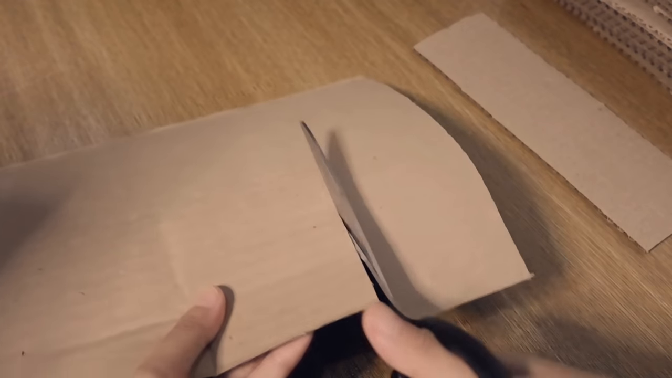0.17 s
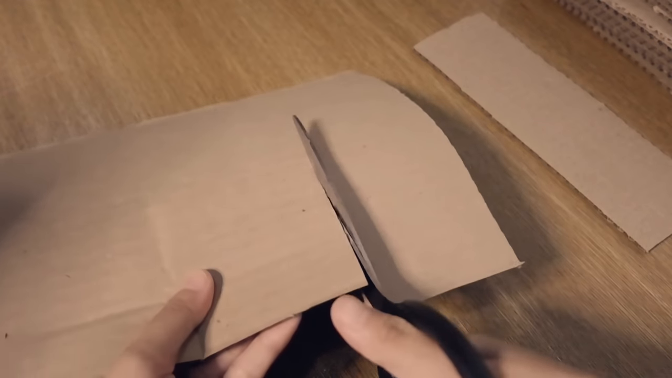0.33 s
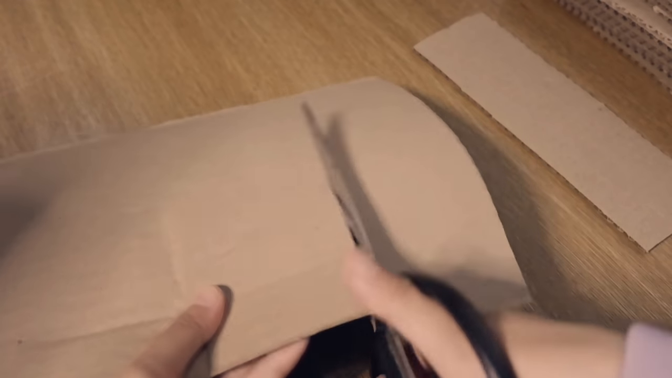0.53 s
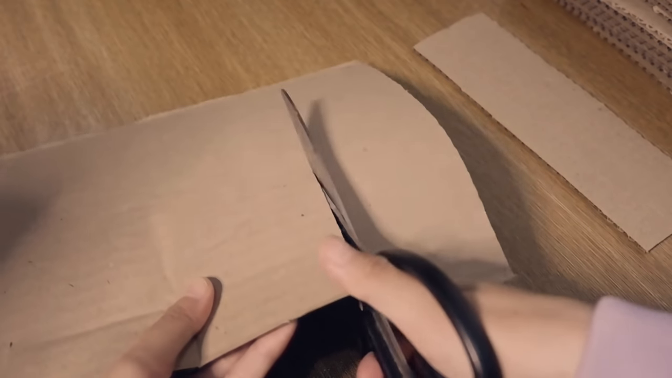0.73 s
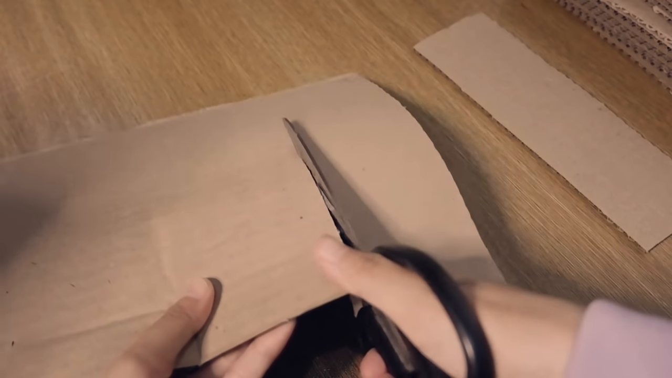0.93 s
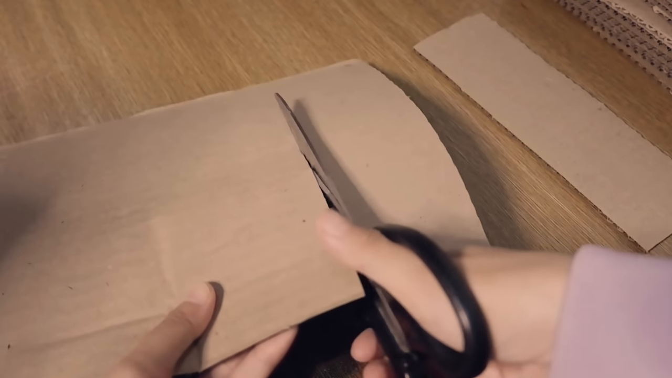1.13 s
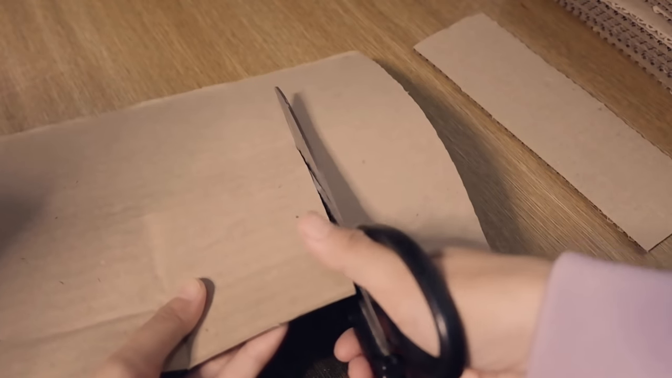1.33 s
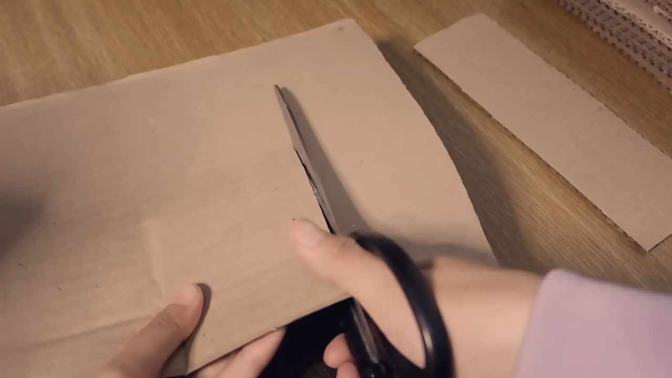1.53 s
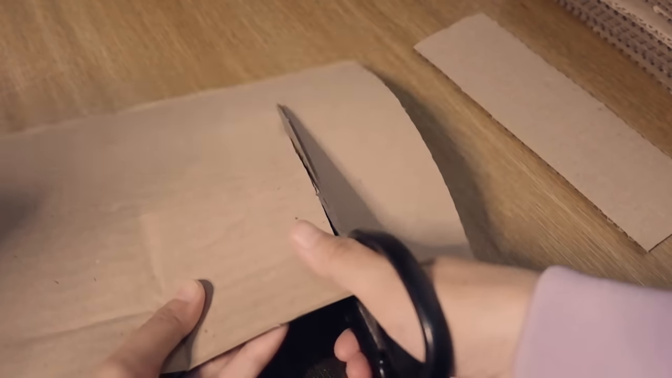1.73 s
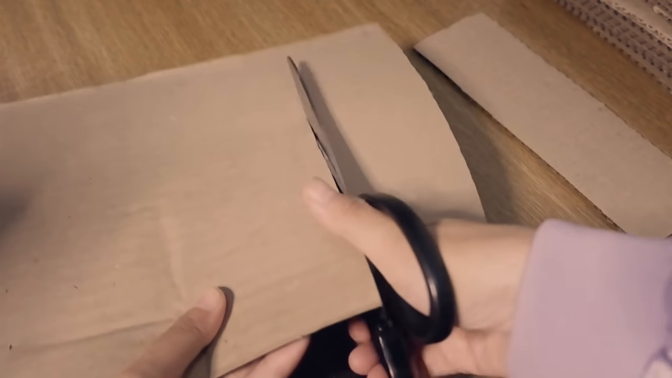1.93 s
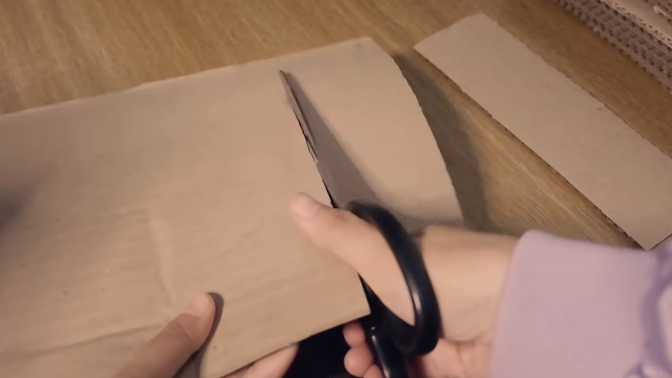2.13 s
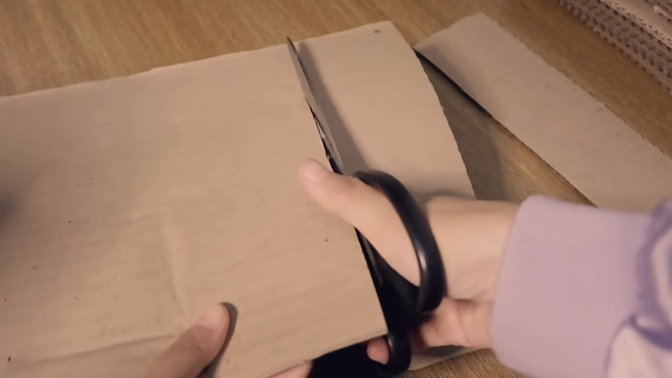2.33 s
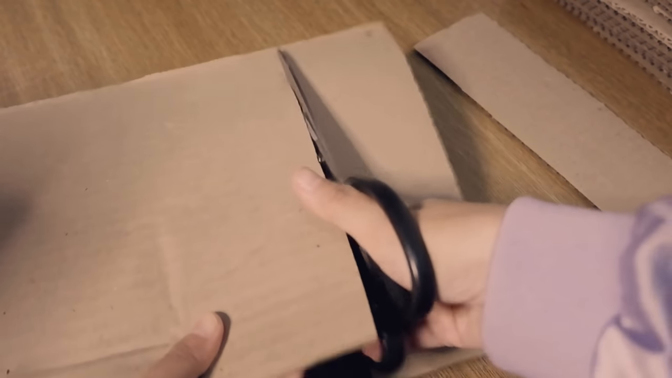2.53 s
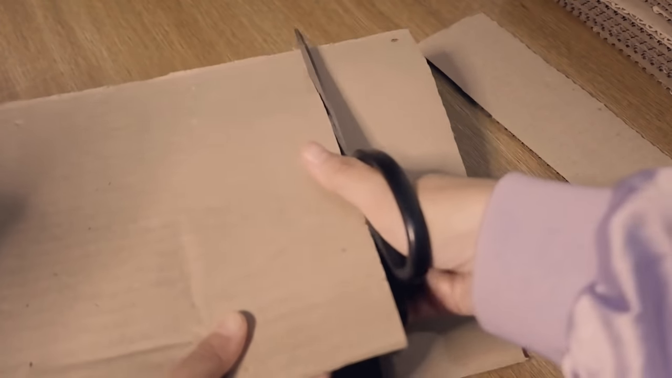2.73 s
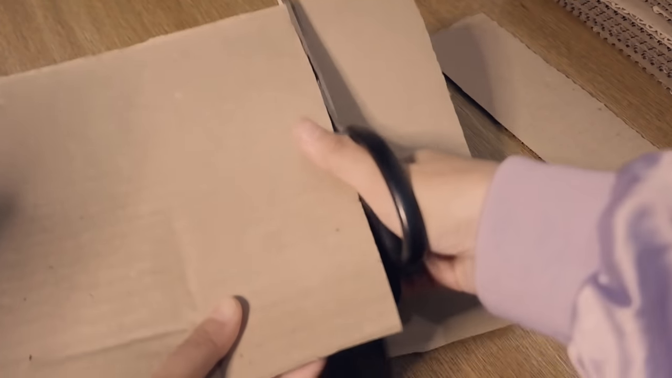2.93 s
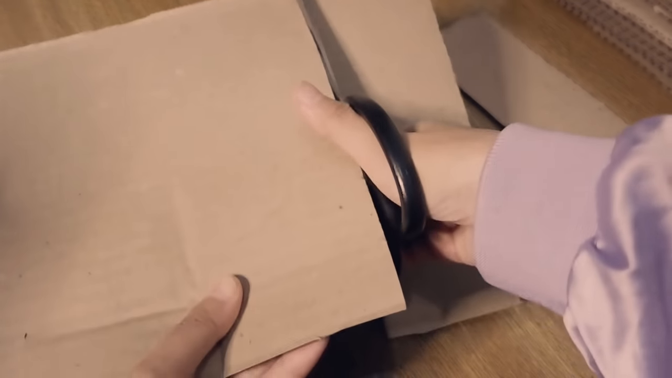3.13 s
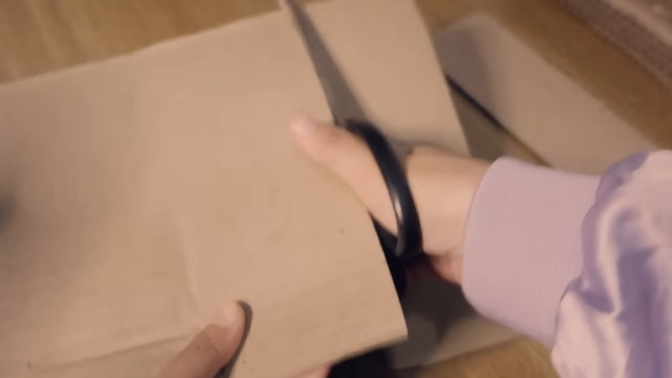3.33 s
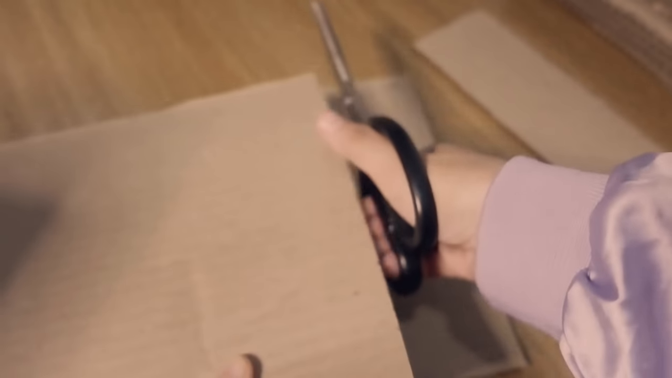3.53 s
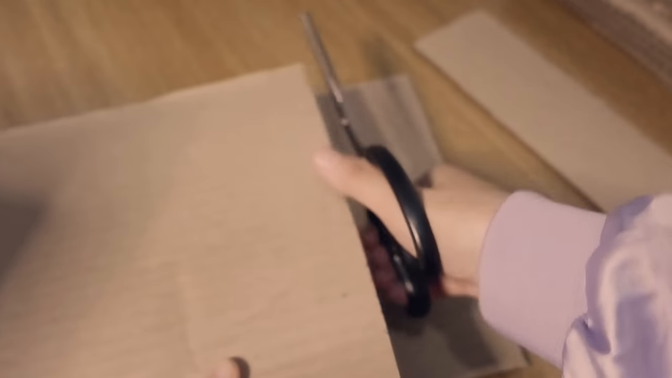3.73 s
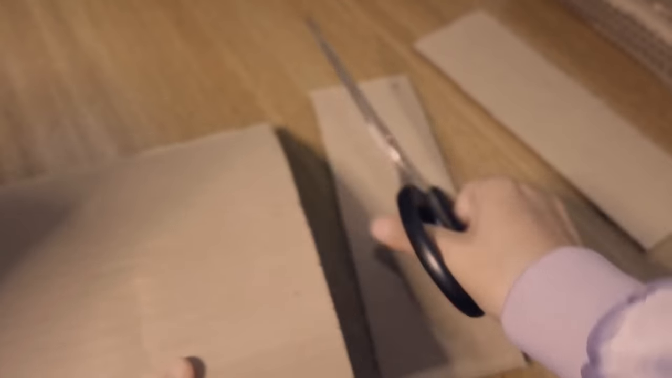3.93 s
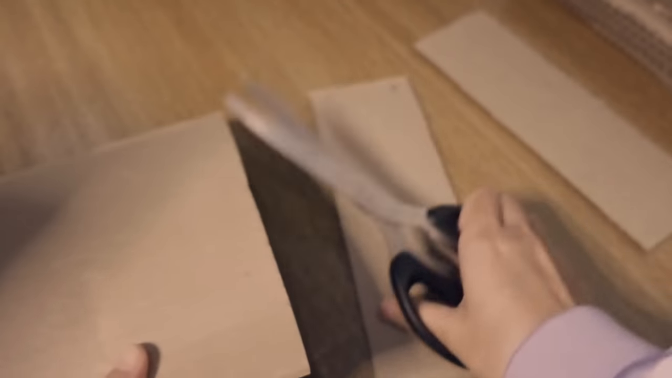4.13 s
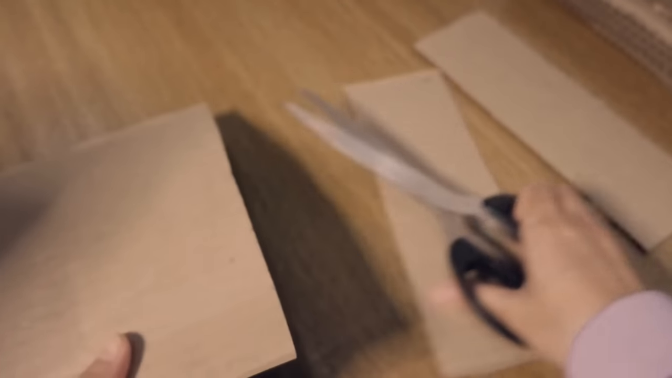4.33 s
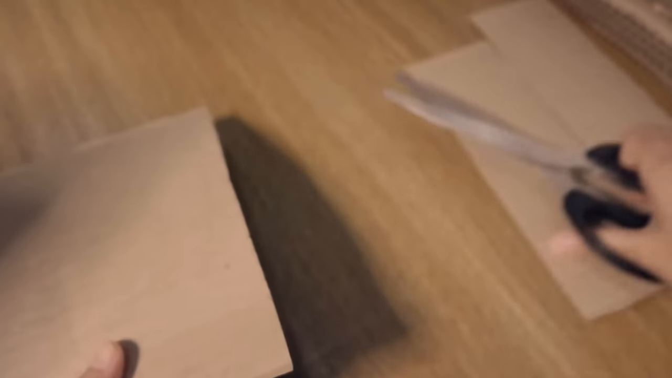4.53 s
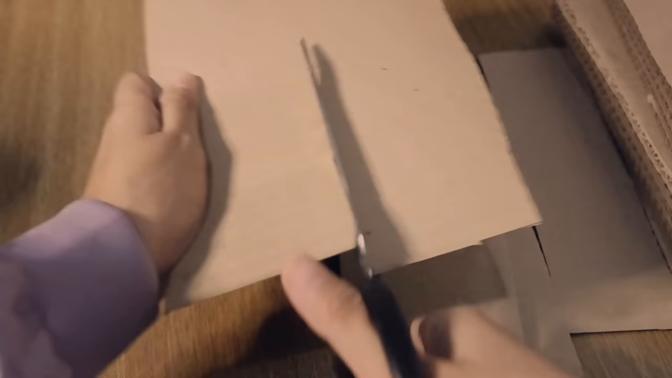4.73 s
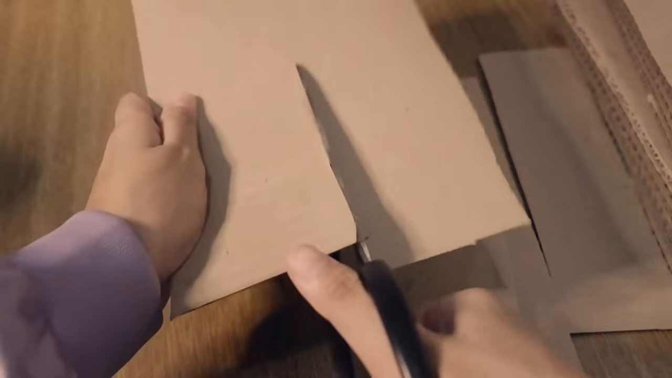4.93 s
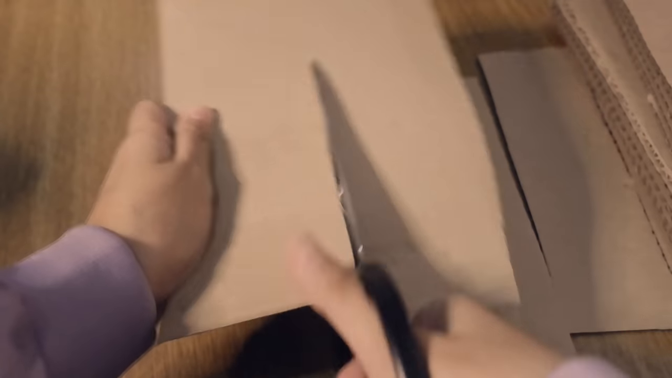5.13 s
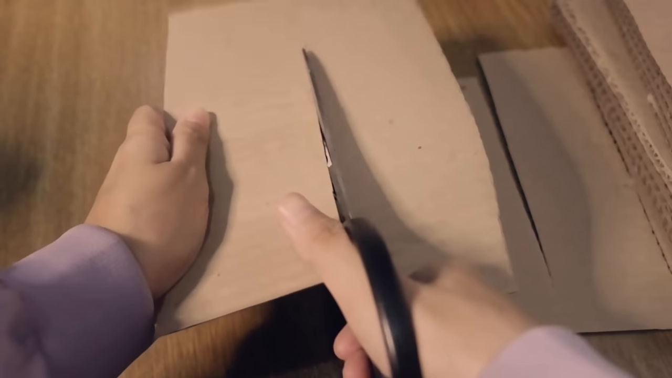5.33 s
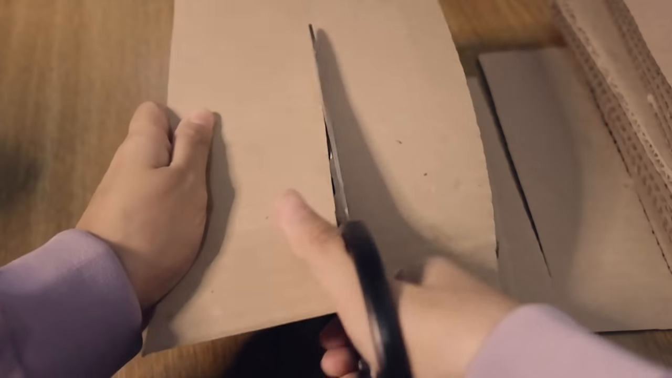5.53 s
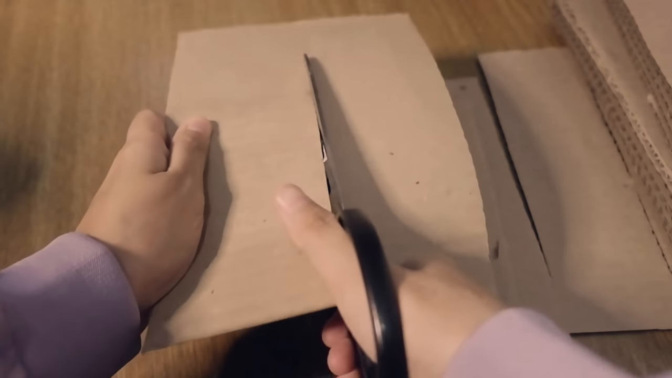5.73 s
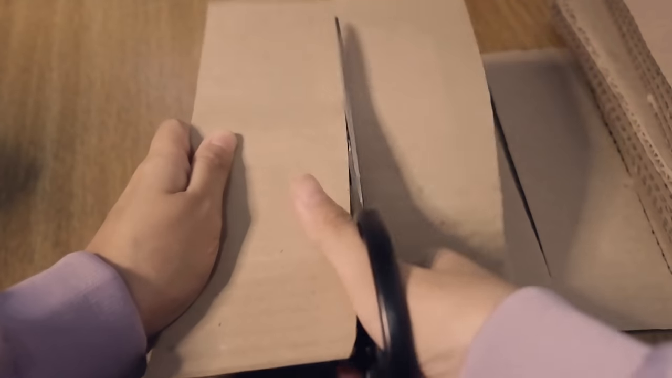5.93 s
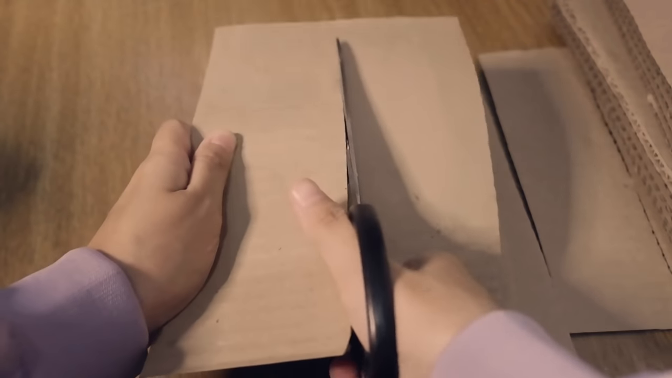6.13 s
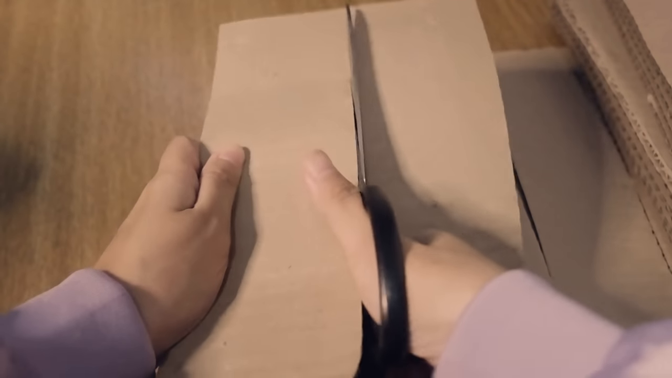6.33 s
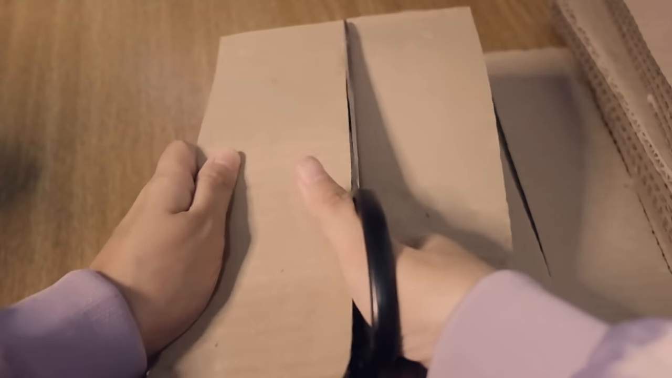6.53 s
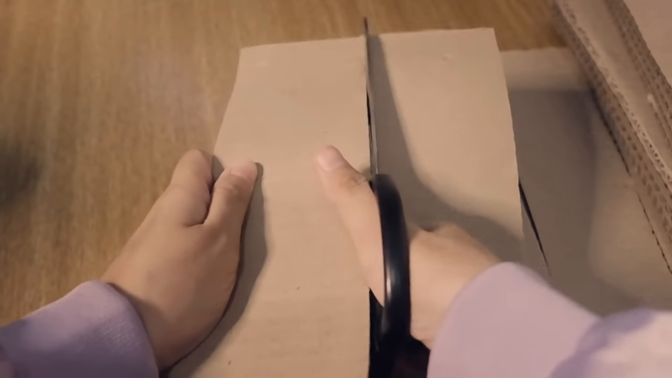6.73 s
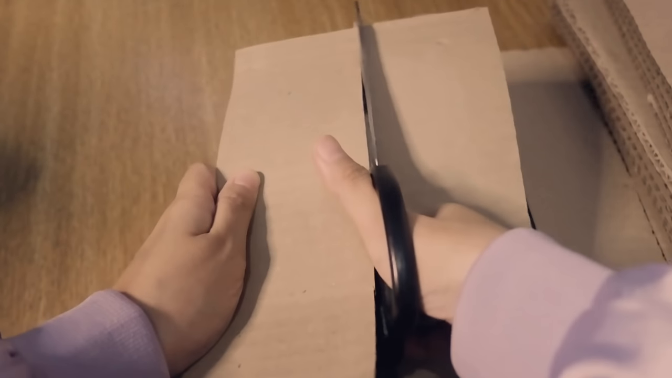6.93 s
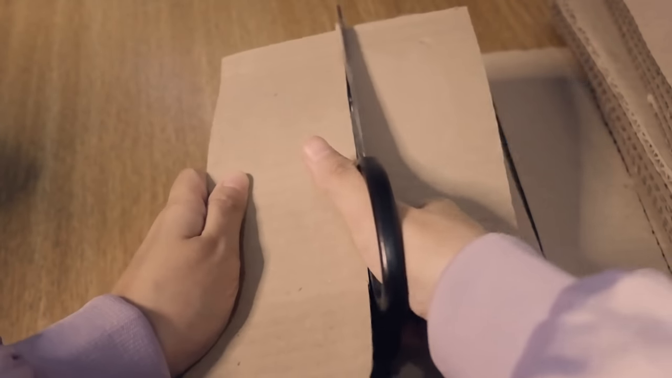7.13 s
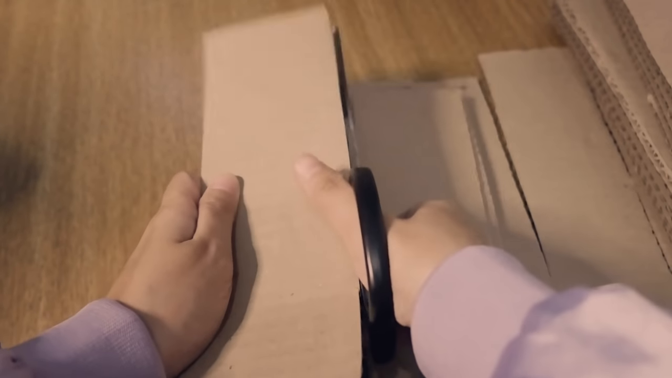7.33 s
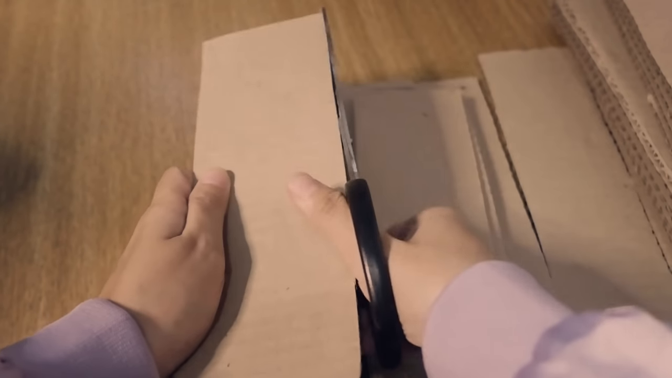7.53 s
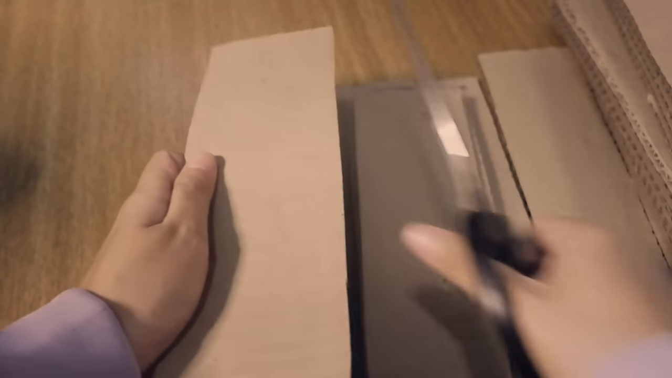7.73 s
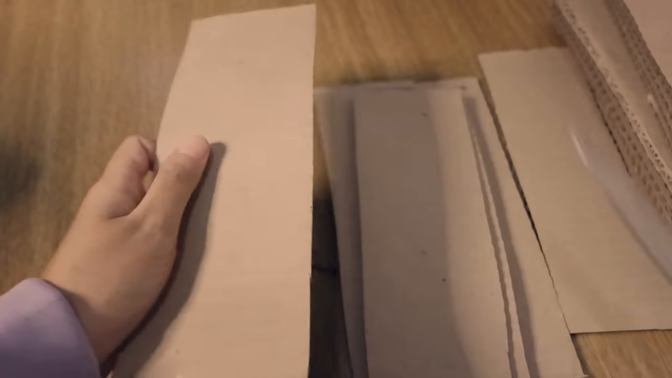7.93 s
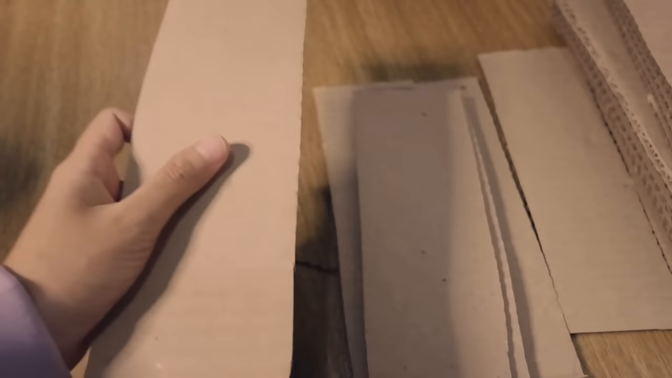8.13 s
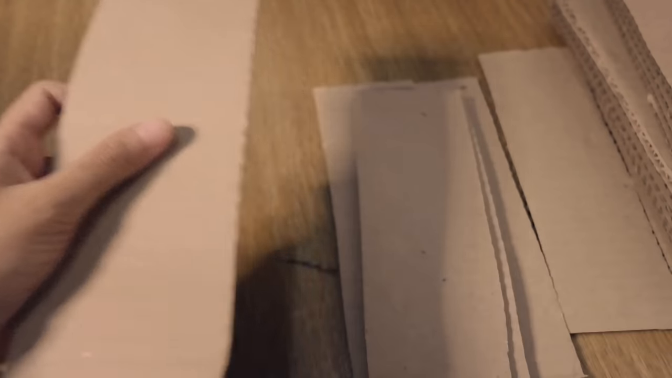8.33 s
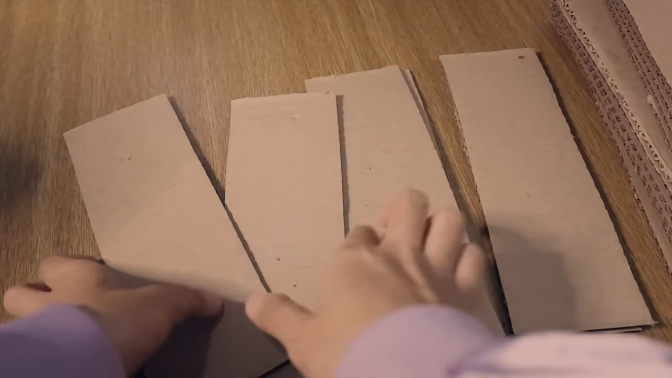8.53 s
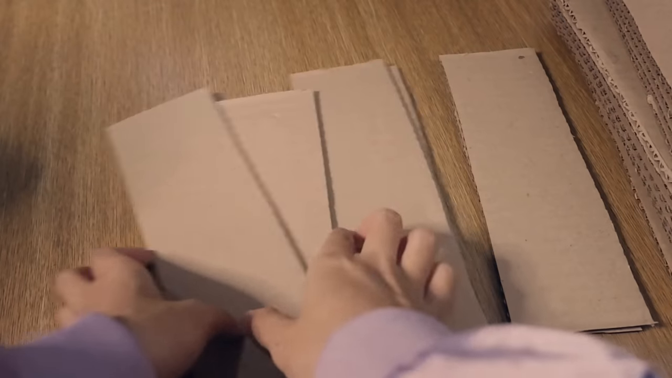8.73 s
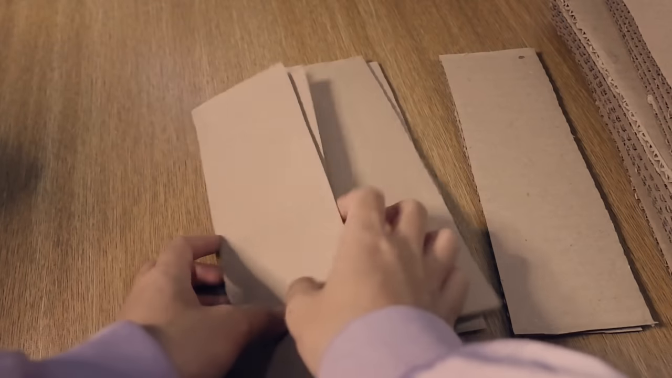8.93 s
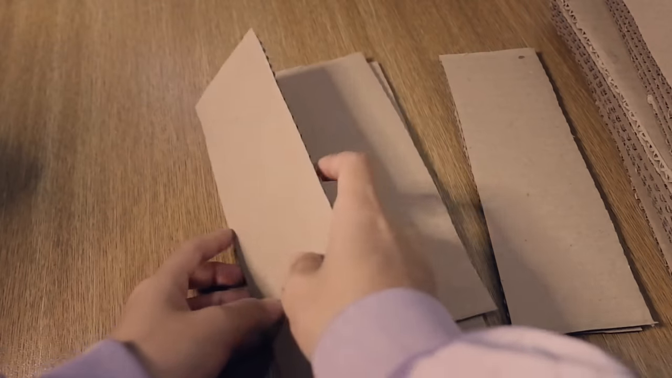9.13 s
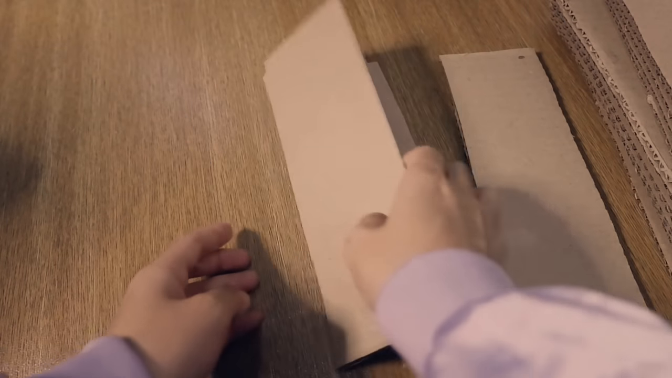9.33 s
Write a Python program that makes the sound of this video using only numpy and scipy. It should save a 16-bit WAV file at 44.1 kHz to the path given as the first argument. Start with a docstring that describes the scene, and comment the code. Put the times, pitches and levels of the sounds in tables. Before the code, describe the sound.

Two strips of stiff board are cut above a wooden desk. Hollow, woody crackles with bright snaps alternate with thin steel scrapes; the blades slam shut at the end of each cut and chatter briefly. Between cuts there is only faint rustle and swish. Afterwards the strips drop softly, slide over one another and are picked up with small taps. Close and detailed, short room echo, faint steady hiss.

```python
"""Cardboard rustles and steel blades hiss open; then each squeeze of large scissors cracks the board.
Two strips are cut off above a wooden desk in a small room, and the blades clack shut as each comes free.
The strips are dropped, slid together and picked up. Cracks and knocks are bursts of random clicks,
hisses and rubs are longer streams of them; filters give each its colour, and resonances make things ring."""
import sys
import numpy as np
from scipy import signal
from scipy.fft import rfft, irfft
from scipy.io import wavfile

SR = 44100
rng = np.random.default_rng(int(sys.argv[2]) if len(sys.argv) > 2 else 0)


def inscribe(sig):
    """Save sig as 16-bit PCM at rate SR to the path in sys.argv[1].

    A 1-D sig is mono; a 2-D sig holds one channel per row.
    Samples are clipped to [-1, 1] before scaling.
    """
    pcm = np.round(np.clip(np.atleast_2d(sig).T, -1, 1) * 32767)
    wavfile.write(sys.argv[1], SR, pcm.astype(np.int16))


N = 418068

# Events. Levels of bursts and moves are those before the room and any resonances.
# the board gives way: start_s, length_s (nominal), level_db, crispness_db
CRACKS = [ (.338, 0.0017, -45.5, 3), (.364, 0.013, -28, -7.5), (.389, .007, -16.5, -10),
          (0.4175, 0.0015, -19.5, -15), (0.448, 0.0035, -24.5, -13.5), (0.485, 0.0044, -37.5, -8),
          (.570, 0.0034, -27.5, -15), (0.593, 0.0028, -27.5, -20), (0.603, 0.0039, -28.5, -5.5),
          (0.817, 0.00082, -23.5, -21), (0.8632, 0.0067, -19.5, -12.5), (0.8832, 0.0071, -18, -11),
          (0.908, 0.00096, -25, -15), (0.936, 0.0045, -24.5, -8), (1.132, 0.0046, -36.5, -14),
          (1.315, 0.0051, -41.5, -25), (1.451, 0.0011, -45, -20), (1.693, .0035, -37, -6.5),
          (1.7194, 0.0027, -18.5, -5), (1.7352, 0.0013, -19.5, -7.5), (1.7684, 0.00071, -22.5, -7),
          (2.0757, 0.0024, -29, 3.5), (2.097, 0.0056, -21.5, -3.5), (2.122, 0.0078, -26.5, -10),
          (2.1378, 0.0024, -24.5, -3), (2.3537, 0.00077, -31.5, -10.5), (2.4195, 0.006, -31.5, -2.5),
          (2.4399, 0.0094, -20.5, -6), (2.4649, 0.0085, -14, -9), (2.488, 0.009, -28.5, -3.5),
          (2.5464, .0055, -24, -3.5), (2.5902, 0.0088, -32.5, -4), (2.7176, .0075, -34, -11),
          (2.7765, 0.0044, -18.5, -5), (2.82, 0.0096, -19.5, -7), (3.373, 0.0018, -29.5, 0.5),
          (3.394, 0.0039, -18, -4), (3.4995, 0.0028, -31.5, 10.5), (4.7807, .006, -29.5, -11),
          (4.938, 0.0027, -32, -3), (4.9669, 0.0018, -16.5, -11.5), (4.9877, 0.005, -17, -18),
          (5.014, .005, -20, -7), (5.199, 0.0054, -29, -16), (5.356, .003, -22.5, -9),
          (5.376, 0.0039, -16.5, -10.5), (5.4045, 0.0038, -18.5, -11), (5.492, 0.0047, -37, -6),
          (5.702, 0.0016, -38, -14), (5.731, 0.0023, -22, -9.5), (5.7625, 0.0048, -14.5, -17.5),
          (5.782, 0.0076, -31.5, -5), (5.8847, .001, -38, -6), (6.098, .005, -29.5, -5),
          (6.1161, 0.0057, -15, -14.5), (6.132, 0.0027, -26.5, -2), (6.1575, .007, -22, -13),
          (6.4103, .004, -34.5, -11), (6.433, 0.0027, -30.5, -10), (6.4458, 0.0037, -22.5, -3),
          (6.4864, .001, -17.5, -11), (6.626, .015, -30, -10), (6.6513, 0.0045, -31.5, -6),
          (6.7491, 0.0024, -23.5, -1), (6.772, 0.0032, -29.5, -13), (6.793, 0.0028, -25, -12.5),
          (6.859, 0.0046, -44, -6), (6.905, 0.0033, -42, -16), (7.1795, 0.0054, -34.5, -10.5),
          (7.246, 0.003, -29, -7), (7.275, 0.003, -29, -10), (7.29, 0.0056, -19.5, -14),
          (7.3342, 0.0027, -20, -4.5)]
# the blades slam shut: start_s, level_db
CLACKS = [(3.4004, -13.5), (7.337, -14.5)]
# strips and fingers knock on the desk: start_s, length_s (nominal), level_db, thump_db (against level_db)
TAPS = [(7.3896, .012, -26, -30), (7.427, 0.0017, -35.5, -0.5), (8.169, 0.0014, -43.5, -6),
        (8.21, 0.0033, -44.5, -18), (8.234, .002, -42, -8), (8.2732, .0036, -38.5, -13),
        (8.284, 0.0028, -43.5, 2), (8.3393, 0.003, -40, -8), (8.947, .0035, -47, -24),
        (8.994, 0.00076, -37.5, -30), (9.034, 0.013, -37.5, -31), (9.08, 0.0067, -42.5, -25),
        (9.15, 0.0044, -50.5, -18), (9.2276, 0.0091, -43.5, -20), (9.387, .0045, -38.5, -12),
        (9.3926, 0.0015, -30.5, -6.5), (9.4046, 0.013, -42, -13)]
# the blades open and push on, levels before the stroke shapes them:
# start_s, end_s, steel_hiss_db, squeal_db, rubbed_sheet_db
OPENINGS = [(0.106, 0.213, -39.5, -77, -45), (.543, 0.627, -35.5, -51, -30.5),
            (1.059, 1.125, -38, -49, -34.5), (1.865, 1.936, -34, -40, -28),
            (2.227, 2.301, -36.5, -43.5, -31), (2.606, 2.683, -36, -48.5, -31.5),
            (2.98, 3.031, -46, -65, -57), (3.088, 3.154, -51, -74, -49), (4.736, 4.815, -31.5, -43.5, -28),
            (5.148, 5.239, -30, -47, -27), (5.534, 5.603, -34.5, -50, -34), (5.902, 6.006, -32, -48, -33.5),
            (6.275, 6.337, -32.5, -42.5, -29.5), (6.609, 6.674, -31.5, -48, -34.5),
            (6.938, 6.99, -42, -56, -41)]
# The next five tables are moves: start_s, fastest_s, end_s, level_db (at the fastest moment).
# A row that ends before it starts is silent.
# strips slide over each other on the desk: start_s, fastest_s, end_s, level_db
SLIDES = [(8.655, 8.715, 8.8, -36.5), (8.74, 8.83, 9.01, -33.5), (8.96, 9.04, 9.4, -46.5),
          (9.38, 9.47, 9.9, -47)]
# the sheet is let go and scuffs down: start_s, fastest_s, end_s, level_db
SCUFF = [(8.26, 8.278, 8.425, -33)]
# a sleeve or the loose strip swishes by; the first row is a short hiss that trails the strip tearing free at
# 3.5 s: start_s, fastest_s, end_s, level_db
SWISHES = [(3.487, 3.502, 3.56, -26), (4.15, 4.174, 4.06, -44.5), (4.2, 4.46, 4.796, -41.5),
           (7.66, 7.73, 7.6, -45.5)]
# the held sheet flexes between cuts and rustles: start_s, fastest_s, end_s, level_db
FLEXES = [(-.05, .01, 0.22, -44), (.1, .18, 0.33, -38.5), (1.13, 1.2, 1.37, -48),
          (1.64, 1.675, 1.74, -44.5), (2.88, 2.95, 3.22, -48.5), (3.4, 3.45, 3.36, -32),
          (4.68, 4.71, 4.76, -48), (6.88, 7.01, 7.2, -48), (7.42, 7.55, 8, -52)]
# the sheet sways and rumbles: start_s, fastest_s, end_s, level_db
SWAYS = [(1.56, 1.66, 2, -53), (3.0, 3.3, 3.9, -67), (6.95, 7.02, 7.13, -52)]
# fingers and edges drag on the sheet and make it groan: start_s, end_s, first_hz, last_hz, level_db
DRAGS = [(0.176, 0.248, 1350, 1046, -45), (0.256, 0.326, 604, 500, -46), (3.05, 3.354, 177.3, 174.4, -54.5),
         (3.838, 3.892, 790, 784, -48), (3.964, 3.977, 800, 780, -50), (7.718, 7.757, 960, 1080, -46.5),
         (7.709, 7.753, 2990, 3100, -55)]

# Colours. Each is a relative spectrum: pitch_hz, level_db (per Hz).
# heave of the whole sheet: pitch_hz, level_db
THUMP_COLOUR = [(60, -37.5), (130, -16.5), (220, -1.5), (330, 0), (520, 5), (700, 9), (1200, -44)]
# flap beside the blades: pitch_hz, level_db
RING_COLOUR = [(300, -40.5), (500, -9.5), (650, -3.5), (1000, -2.5), (1450, -1), (1800, -3), (2400, -37),
               (4000, -33)]
# lower part of breaking fibres: pitch_hz, level_db
CRUNCH_COLOUR = [(1200, -44.5), (1900, 11), (2700, 10), (3250, 11), (3750, 1.5), (4800, -38.5)]
# bright part of breaking fibres: pitch_hz, level_db
SNAP_COLOUR = [(3000, -12), (3900, 0), (4500, 8), (5300, 8), (7000, -2.5), (9300, -5), (11000, -13),
               (12500, -37), (16000, -56)]
# blow of the handles: pitch_hz, level_db
CLACK_COLOUR = [(80, -20), (200, -8), (450, -4), (900, -4), (1400, 1), (2000, -1), (2800, 0), (3800, -3),
                (4500, 1), (5800, -1), (6700, 1), (8500, -9), (12000, -25), (16000, -29)]
# blades chattering on each other: pitch_hz, level_db
BUZZ_COLOUR = [(300, -14), (500, -5), (900, -7), (1400, -2), (2500, -4), (3700, -4), (4500, -1), (6600, 1),
               (8500, -5), (10500, -12), (12500, -27), (16000, -38)]
# cardboard on wood: pitch_hz, level_db
KNOCK_COLOUR = [(300, -37), (600, -8), (900, -5), (1200, 3.5), (1550, 5.5), (1900, -15), (2500, -4),
                (4000, -35)]
# steel on steel: pitch_hz, level_db
STEEL_COLOUR = [(1200, -16), (1900, 5), (3000, 9.5), (3800, 0.5), (4500, 5.5), (5500, 3.5), (7500, 0.5),
                (9200, -5.5), (10500, -7), (12000, -21), (16000, -28)]
# cut edges rubbed by the blades: pitch_hz, level_db
RUB_COLOUR = [(80, -14), (200, -4.5), (320, 5.5), (450, 8.5), (750, 8), (1100, 3), (1500, 5), (2200, -15),
              (4000, -35)]
# strip on strip: pitch_hz, level_db
SLIDE_COLOUR = [(300, -30.5), (850, -14.5), (1100, 1.5), (1400, 9), (2000, -1), (2900, 2), (3900, -3),
                (5000, -2.5), (7000, -11), (10000, -16.5), (13000, -36)]
# sheet scuffing down: pitch_hz, level_db
SCUFF_COLOUR = [(80, -20), (200, 6), (280, -10), (450, 0), (800, -25), (1300, -22), (2100, -15),
                (3000, -1.5), (3800, -13), (5250, -5.5), (7000, -11), (10000, -17), (14000, -35)]
# passing sleeve or strip: pitch_hz, level_db
SWISH_COLOUR = [(500, -23.5), (1100, -5), (1500, 0), (2200, -3), (3100, 4), (3900, -1.5), (5000, -2),
                (7000, -13), (10000, -22), (13000, -42)]
# flexing sheet: pitch_hz, level_db
RUSTLE_COLOUR = [(150, -18), (300, -8.5), (550, -0.5), (800, 1.5), (1300, -1.5), (2000, -7), (5000, -26)]
# swaying sheet: pitch_hz, level_db
RUMBLE_COLOUR = [(30, -20), (75, -2), (110, -16), (180, 0), (260, -10), (500, -41)]
# steady background: pitch_hz, level_db
AIR_COLOUR = [(15, -46.5), (25, -25), (80, -10), (108, -12), (185, -4), (309, -10.5), (384, -10), (451, -9),
              (677, -12.5), (754, -11.5), (936, -13.5), (1560, -20), (3430, -21), (4490, -17),
              (16000, -30.5)]

# Space and bodies.
# colour of the room's difference between left and right: pitch_hz, gain_db
ROOM_WIDTH = [(60, -6), (200, -24), (1000, -27), (2500, -18), (5000, -12), (9000, -6), (15000, -8)]
# left-right difference of the background, against its common part: pitch_hz, gain_db
AIR_WIDTH = [(60, -4), (110, -6.5), (200, -5.5), (380, -4), (700, -5.5), (1290, -2), (2380, 0),
             (4400, -1.5), (8120, -2), (15000, 2)]
# time in which the room's echoes fall by 60 dB: pitch_hz, decay_s
ROOM_DECAY = [(150, 1), (500, 0.38), (1500, 0.46), (5000, 0.39), (12000, 0.23)]
# gain of the room's echoes before they are split into bands: pitch_hz, gain_db
ROOM_ECHO = [(100, 4), (220, -10.5), (400, -11), (1000, -12), (2500, -8), (5000, -11.5), (10000, -7)]
# resonances of the sheet as held for the first cut: pitch_hz, width_hz, level_db (over the plain sound)
FIRST_SHEET = [(270, 64, -12.5), (376, 51, -4.5), (464, 16, -13), (598, 50, -20), (737, 38, -1),
               (1138, 8, -5), (1428, 22, 0), (1590, 16, -2.5)]
# the same for the second cut: pitch_hz, width_hz, level_db (over the plain sound)
SECOND_SHEET = [(192, 14, 3), (345, 21, -5), (474.4, 9.1, -1), (646, 30, -20), (848, 100, -4.5),
                (963, 79, -3), (1070, 89, -1), (1293, 27, -4.5)]
# resonances of the blades: pitch_hz, width_hz, level_db (over the plain sound)
BLADES = [(2680, 55, -7), (3000, 27, -38), (4180, 79, -5), (4800, 25, -45), (5320, 160, -15),
          (5880, 82, -17), (8740, 200, -11)]
# the sheet's sound shifts as the blades cross it and the grip shifts, one curve a strip:
# time_s, flap_ring_hz, bending_mode_hz, thump_db, snap_db (both against the crack's level)
SHEET_CURVES = [
    [(.4, 800, 290, -5.5, -6.5), (.87, 765, 223, -7.5, -1), (1.73, 1000, 415, -6.5, -2),
     (2.1, 1140, 397, -6, -3), (2.46, 1190, 484, -8, -5), (2.8, 1070, 610, -10, -8),
     (3.39, 840, 338, -6, -11)],
    [(4.98, 800, 568, -5.5, -3.5), (5.38, 910, 530, -7, -3.5), (5.75, 940, 333, -10, -4),
     (6.12, 1010, 297, -6, -6), (6.45, 880, 278, -4.5, -6), (6.77, 870, 412, -7, -3),
     (7.28, 1040, 324, -8.5, -2)],
]

BURST = 4096  # samples in one burst
TIME = np.arange(N) / SR
AGE = TIME[:BURST]  # seconds since a burst began
LEAD_S = .008  # fibres strain this long before a fracture
REGRIP_S = 4.4  # the second strip's grip begins
AIR_DB = -51  # level of the part shared by left and right
CUTOFF_HZ = 16200
FLAP_WIDTH_HZ, RING_DB, CRUNCH_DB = 470, -3.5, -1  # levels against the crack's
BEND_WIDTH_HZ, BEND_DB = 57, 4.5  # the bending mode over the plain thump
SNAP_FOLLOWS = 0.93  # the snap takes this share of a crack's crispness
SLAM_THUMP_DB, CHATTER_DB = -12, -12  # against the blow of the handles
TAP_KNOCK_DB, TAP_CRUNCH_DB, TAP_SNAP_DB = -2, -1.5, -6  # against the tap's level
HARDEST_RUB = .7  # share of the stroke at which the cut edges press hardest


def from_db(db):
    """Turn decibels into gain."""
    return 10 ** (np.asarray(db) / 20)


def rms_one(x):
    """Scale to an rms of 1."""
    return x / np.sqrt(np.mean(x ** 2) + 1e-20)


def at_hz(points, hz):
    """Read a table on a log-frequency axis."""
    table = np.array(points)
    return np.interp(np.log(np.maximum(hz, 1)), np.log(table[:, 0]), table[:, 1])


def colour(x, spectrum):
    """Filter with the given spectrum, without sounding ahead of time (minimum phase)."""
    hz = np.arange(BURST // 2 + 1) * SR / BURST
    cepstrum = irfft(np.log(from_db(at_hz(spectrum, hz))))
    # folding the second half onto the first puts the response after time zero
    cepstrum[1:BURST // 2] *= 2
    cepstrum[BURST // 2 + 1:] = 0
    response = irfft(np.exp(rfft(cepstrum)))
    return signal.oaconvolve(x, response)[:len(x)]


def resonance(x, hz, width_hz):
    """One resonance with a gain of 1 on top."""
    r = np.exp(-np.pi * width_hz / SR)
    feedforward = np.array([1, 0, -1]) * (1 - r * r) / 2
    feedback = [1, -2 * r * np.cos(2 * np.pi * hz / SR), r * r]
    return signal.lfilter(feedforward, feedback, x + 1e-12)


def resonate(x, modes):
    """A body adds its resonances to the sound that shakes it."""
    return x + sum(from_db(db) * resonance(x, hz, width_hz) for hz, width_hz, db in modes)


def grains(per_s, spread_db, size):
    """Tiny clicks of uneven size at random moments."""
    born = np.flatnonzero(rng.random(size) < per_s / SR)
    clicks = np.full(size, 1e-9)
    draw = rng.laplace(0, 1, size)[born]
    clicks[born] = np.sign(draw) * from_db(spread_db * np.minimum(np.abs(draw), 4))
    return clicks


def add(track, s, burst, db):
    """Add a burst at time s; its level is its energy spread over 20 ms."""
    start = int(s * SR)
    gain = from_db(db) * np.sqrt(SR / 50 / np.sum(burst ** 2))
    piece = (burst * gain)[:N - start]
    track[start:start + len(piece)] += piece


def stereo(mid, side):
    """Left and right from their common part (mid) and their difference (side)."""
    return np.array([mid + side, mid - side])


def swells(moves, rise_power=0.77, fall_power=1.04):
    """Gain over time of moves that speed up from rest and slow down again."""
    gain = np.zeros(N)
    for start, fastest, end, db in moves:
        first, last = np.searchsorted(TIME, [start, end])
        t = TIME[first:last]
        rise = np.clip((t - start) / max(fastest - start, 1e-3), 0, 1)
        fall = np.clip((end - t) / max(end - fastest, 1e-3), 0, 1)
        gain[first:last] += from_db(db) * rise ** rise_power * fall ** fall_power
    return gain


def friction(spectrum, per_s, spread_db, flutter_db=3.5, flutter_per_s=90):
    """Rubbing: small slips, coming in uneven clumps, through the colour of what is rubbed; rms 1."""
    clumps = np.interp(TIME * flutter_per_s, np.arange(BURST), rng.standard_normal(BURST))
    slips = grains(per_s, spread_db, N) * from_db(flutter_db * clumps)
    return rms_one(colour(slips, spectrum))


def fracture(length, crumble_db, crumble_s, strain_db=-20, strain_s=0.0032):
    """A few fibres strain and part, then an avalanche that grows with length; more crumble afterwards."""
    t = AGE - LEAD_S
    strain = from_db(strain_db) * np.exp(-np.abs(t) / strain_s)
    avalanche = np.exp(-np.abs(t / max(1.22 * length, 1e-3)) ** 3)
    crumble = from_db(crumble_db) * np.exp(-np.abs(t) / crumble_s)
    envelope = np.where(t < 0, strain, avalanche + crumble)
    return grains(per_s=16000, spread_db=3.0, size=BURST) * envelope


def air():
    """Steady background of the room and the microphones' hiss: coloured noise, different left and right."""
    mid, side = (rms_one(colour(rng.standard_normal(N), AIR_COLOUR)) for _ in range(2))
    return from_db(AIR_DB) * stereo(mid, colour(side, AIR_WIDTH))


def room_tail(ceiling_s, ceiling_db):
    """Diffuse echoes dying band by band, swelling when the ceiling's reflection arrives."""
    t, tail = TIME[:SR * 3 // 5], 0
    ceiling = from_db(ceiling_db) * (t > ceiling_s) * np.exp(-np.abs(t - ceiling_s) / .012)
    arrival = np.clip(t / .008, 0, 1) * (1 + ceiling)
    edges = np.geomspace(60, 17000, 13)
    for low, high in zip(edges, edges[1:]):
        hz = np.sqrt(low * high)
        decay = arrival * from_db(-60 * t / at_hz(ROOM_DECAY, hz))
        echoes = rng.standard_normal(len(t)) * decay / np.sqrt(np.sum(decay ** 2))
        band = signal.butter(2, [low, high], "band", fs=SR, output="sos")
        tail = tail + from_db(at_hz(ROOM_ECHO, hz)) * signal.sosfilt(band, echoes)
    return tail


def room(x):
    """Two close microphones hear the direct sound, the desk's scatter and the room's echoes."""
    mid, side = (room_tail(ceiling_s=.018, ceiling_db=3) for _ in range(2))
    t = TIME[:len(side)]
    scatter = rng.standard_normal(len(side)) * t * np.exp(-t / .0007)
    scatter = scatter / np.sqrt(np.sum(scatter ** 2))
    side = colour(from_db(4) * side + from_db(2.0) * scatter, ROOM_WIDTH)
    mid[0] += 1  # the direct sound
    left, right = stereo(signal.oaconvolve(x, mid)[:N], signal.oaconvolve(x, side)[:N])
    # pitch_hz, gain_db: added on the left, taken away on the right
    lean = np.array([(100, 0.48), (600, 0.98), (1400, 0.058), (2800, 0.19), (5000, -0.9), (10000, -0.33)])
    return np.array([colour(left, lean), colour(right, lean * [1, -1])])


def groans(grip_cycles=2.5):
    """Stick and slip shakes one resonance of the sheet, whose pitch moves as the sheet bends."""
    out = np.zeros(N)
    for start, end, first_hz, last_hz, db in DRAGS:
        first, last = int(start * SR), int(end * SR)
        progress = np.linspace(0, 1, last - first)
        phase = 2 * np.pi * np.cumsum(first_hz + (last_hz - first_hz) * progress) / SR
        # the grip drifts at random, with a new value every few cycles
        grip_steps = (phase - phase[0]) / (2 * np.pi * grip_cycles)
        grip = np.interp(grip_steps, np.arange(BURST), rng.standard_normal(BURST))
        swell = np.sqrt(progress * (1 - progress))
        out[first:last] += from_db(db) * rms_one(grip * np.sin(phase) * swell)
    return out


def handling():
    """Many small slips make strips swish, slide and scuff, and the sheet rustle, rumble and groan."""
    swishes = swells(SWISHES) * friction(SWISH_COLOUR, per_s=14000, spread_db=5.5, flutter_db=0.0)
    slides = swells(SLIDES) * friction(SLIDE_COLOUR, per_s=2500, spread_db=2.8, flutter_db=2.8)
    scuff = swells(SCUFF) * resonate(friction(SCUFF_COLOUR, per_s=1200, spread_db=2.5), BLADES)
    rustle = swells(FLEXES) * friction(RUSTLE_COLOUR, per_s=2000, spread_db=1.8)
    rumble = swells(SWAYS) * friction(RUMBLE_COLOUR, per_s=570, spread_db=2.0)
    return swishes + slides + scuff + rustle + rumble + groans()


def taps():
    """Light knocks of cardboard on wood, too damped to hold a pitch; a strip that lands flat thumps more."""
    out = np.zeros(N)
    for s, length, db, thump_db in TAPS:
        touch = fracture(length, crumble_db=-1, crumble_s=0.013)
        add(out, s - LEAD_S, colour(touch, THUMP_COLOUR), db + thump_db)
        add(out, s - LEAD_S, colour(touch, KNOCK_COLOUR), db + TAP_KNOCK_DB)
        add(out, s - LEAD_S, colour(touch, CRUNCH_COLOUR), db + TAP_CRUNCH_DB)
        add(out, s - LEAD_S, colour(touch, SNAP_COLOUR), db + TAP_SNAP_DB)
    return out


def clacks():
    """The handles hit their stop with a hard blow that jolts the sheet; the blades chatter as it dies away."""
    out = np.zeros(N)
    for s, db in CLACKS:
        blow_fade = np.exp(-AGE / 0.0011) + from_db(-3.0) * np.exp(-AGE / 0.0039)
        blow = rng.standard_normal(BURST) * blow_fade
        chatter_fade = np.exp(-AGE / 0.2) * (1 - AGE / AGE[-1])
        chatter = grains(per_s=14000, spread_db=2.0, size=BURST) * chatter_fade
        add(out, s, colour(blow, CLACK_COLOUR), db)
        add(out, s, colour(blow, THUMP_COLOUR), db + SLAM_THUMP_DB)
        add(out, s, colour(chatter, BUZZ_COLOUR), db + CHATTER_DB)
    return out


def openings(rise_s=0.014, fall_s=0.041, rub_s=0.046):
    """Steel hisses and squeals on steel as the blades move; the cut edges rub hardest as they push on."""
    hiss, squeal, rub = np.zeros((3, N))
    for start, end, hiss_db, squeal_db, rub_db in OPENINGS:
        near = np.abs(TIME - start) < .25
        t = TIME[near]
        speeding_up = np.clip((t - start) / rise_s + 0.32, 0, 1)
        slowing_down = np.clip((end - t) / fall_s + 0.48, 0, 1)
        moving = speeding_up * slowing_down
        hardest = start + HARDEST_RUB * (end - start)
        pressing = np.exp(-((t - hardest) / rub_s) ** 2)
        hiss[near] += from_db(hiss_db) * moving * (0.67 + 0.23 * pressing)
        squeal[near] += from_db(squeal_db) * moving
        rub[near] += from_db(rub_db) * (0.24 * moving + 0.4 * pressing)
    steel = hiss * friction(STEEL_COLOUR, per_s=4500, spread_db=2.6, flutter_db=1.6)
    whistle = resonance(grains(9000, 2.5, N), hz=9280, width_hz=800)
    whistle = resonance(whistle, hz=9280, width_hz=2000)
    edge = squeal * rms_one(whistle)
    sheet = rub * friction(RUB_COLOUR, per_s=1000, spread_db=2.8, flutter_db=2.6)
    return steel + edge + sheet


def sheet_at(s):
    """Flap ring, bending mode, thump and snap of the sheet, read from its strip's curve at time s."""
    times, *columns = np.transpose(SHEET_CURVES[int(s > REGRIP_S)])
    return [np.interp(s, times, column) for column in columns]


def cutting(tearing_db=-11, fresh_db=-36):
    """Each fracture thumps the sheet, rings the flap beside the blades and gives its own crunch and snap."""
    out, previous = np.zeros(N), 0
    for s, length, db, crisp_db in CRACKS:
        flap_hz, bend_hz, thump_db, snap_db = sheet_at(s)
        # intact board gives way at once; board that is already tearing crackles just before
        strain_db = tearing_db if s - previous < .05 else fresh_db
        previous = s
        heave = fracture(length, crumble_db=-4, crumble_s=.010, strain_db=strain_db)
        push = fracture(length, crumble_db=-9, crumble_s=.009, strain_db=strain_db)
        fibres = fracture(length, crumble_db=-16, crumble_s=.012, strain_db=strain_db)
        bend = heave + from_db(BEND_DB) * resonance(heave, bend_hz, BEND_WIDTH_HZ)
        flap = resonance(push, flap_hz, FLAP_WIDTH_HZ) + 0.12 * push
        add(out, s - LEAD_S, colour(bend, THUMP_COLOUR), db + thump_db)
        add(out, s - LEAD_S, colour(flap, RING_COLOUR), db + RING_DB)
        add(out, s - LEAD_S, colour(fibres, CRUNCH_COLOUR), db + CRUNCH_DB + crisp_db)
        add(out, s - LEAD_S, colour(fibres, SNAP_COLOUR), db + snap_db + SNAP_FOLLOWS * crisp_db)
    return out


def scene():
    """The scissors shake blades and sheet, which is gripped anew for the second strip; the room answers."""
    scissors = resonate(cutting() + openings(), BLADES)
    first_grip = TIME < REGRIP_S
    sheet = np.where(first_grip, resonate(scissors, FIRST_SHEET), resonate(scissors, SECOND_SHEET))
    return room(sheet + clacks() + taps() + handling()) + air()


def record(dry, release_db_per_s=18, threshold_db=-2.0, attack_s=0.0014):
    """A limiter ducks after the hardest hits and recovers slowly; the rest is clipped and the top is cut."""
    peak_db = 20 * np.log10(np.abs(dry).max(axis=0) + 1e-9)
    over = np.maximum(peak_db - threshold_db, 0)
    # hold each overshoot and let it go at a steady rate
    release = release_db_per_s * TIME
    held = np.maximum.accumulate(over + release) - release
    r = np.exp(-1 / (attack_s * SR))
    ducking_db = signal.lfilter([1 - r], [1, -r], held)
    limited = np.clip(dry * from_db(-ducking_db), -1, 1)
    top_cut = signal.ellip(10, .1, 80, CUTOFF_HZ, fs=SR, output="sos")
    return signal.sosfilt(top_cut, limited)


dry = scene()
out = record(dry)
inscribe(out)
```